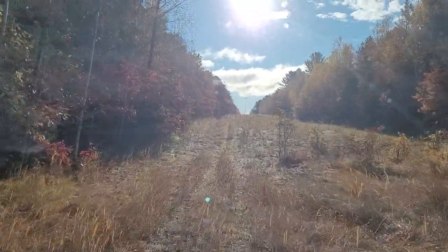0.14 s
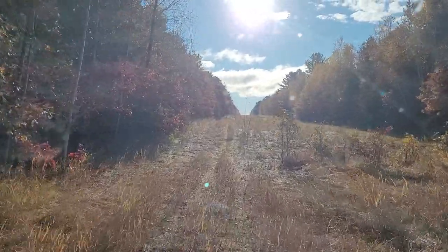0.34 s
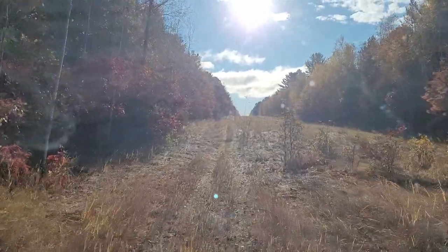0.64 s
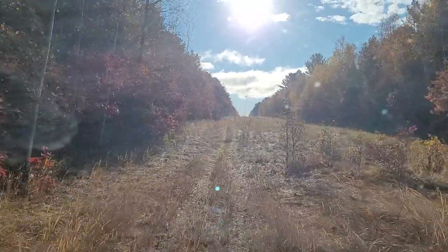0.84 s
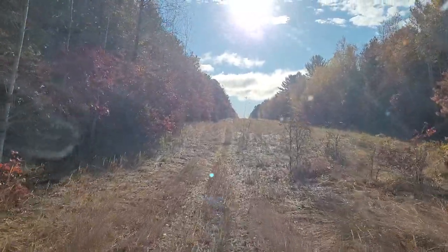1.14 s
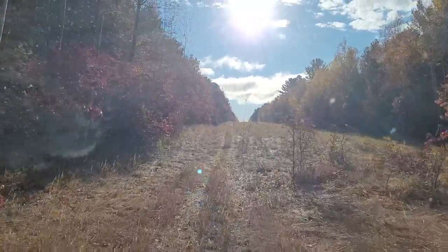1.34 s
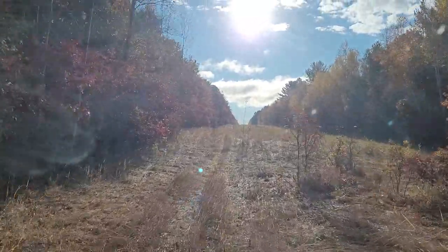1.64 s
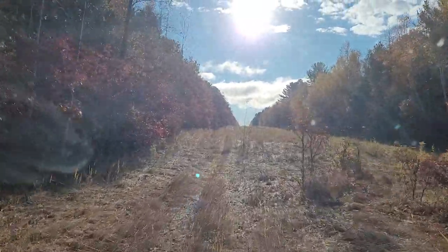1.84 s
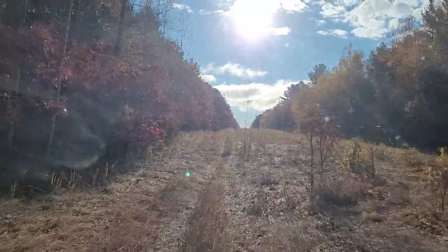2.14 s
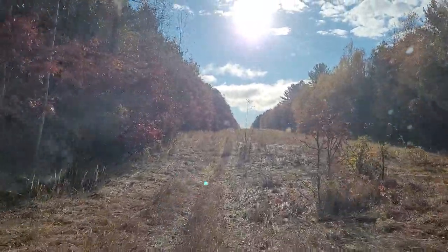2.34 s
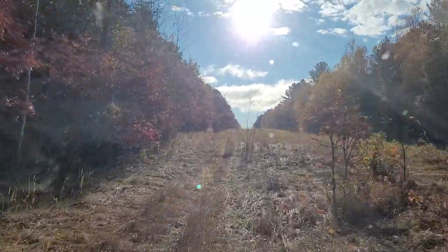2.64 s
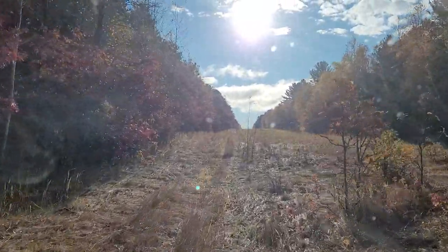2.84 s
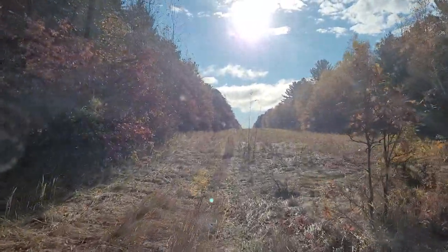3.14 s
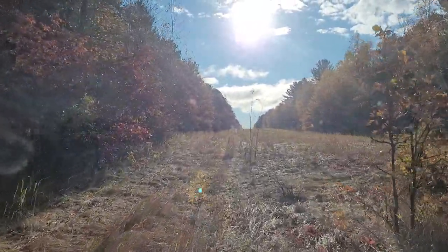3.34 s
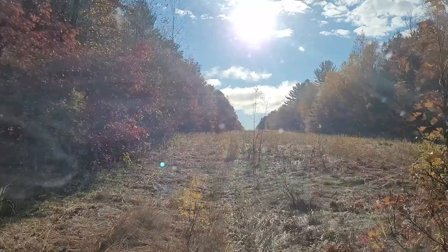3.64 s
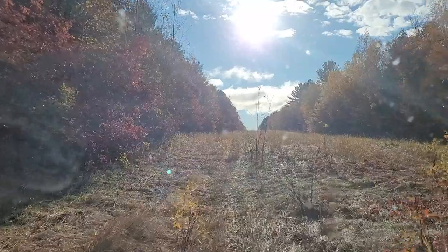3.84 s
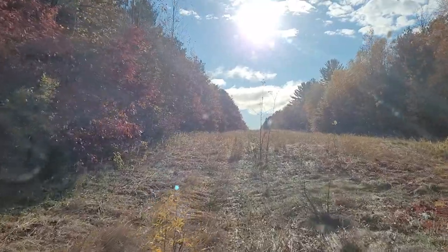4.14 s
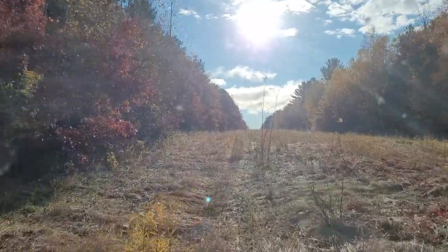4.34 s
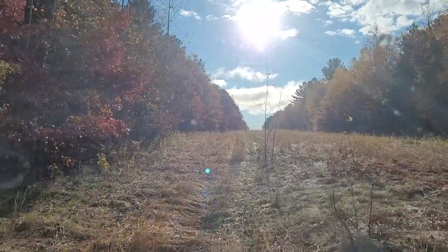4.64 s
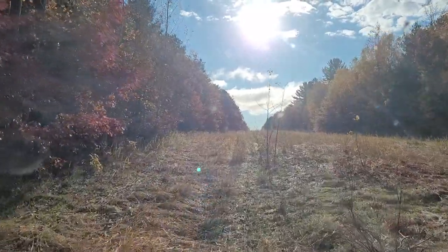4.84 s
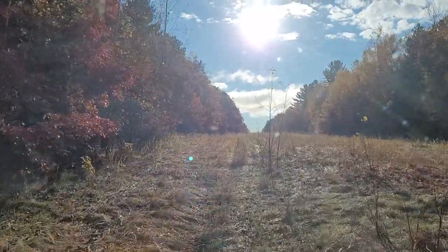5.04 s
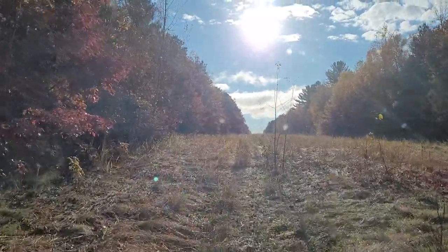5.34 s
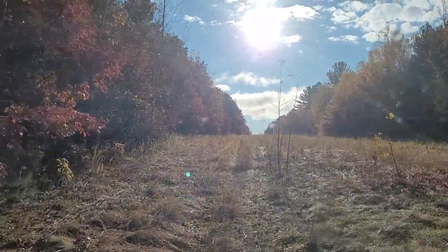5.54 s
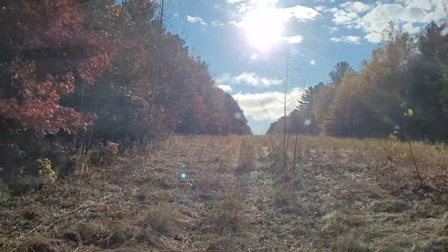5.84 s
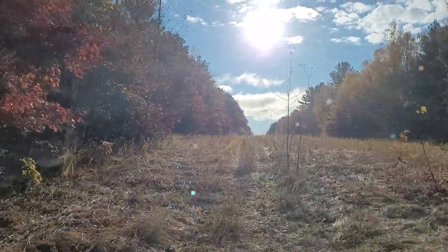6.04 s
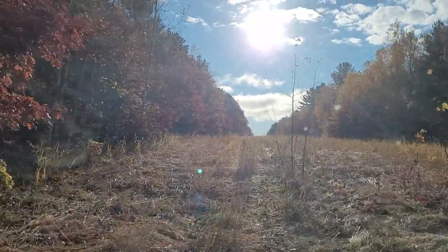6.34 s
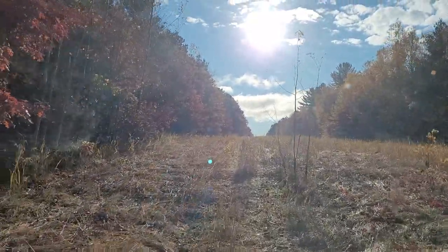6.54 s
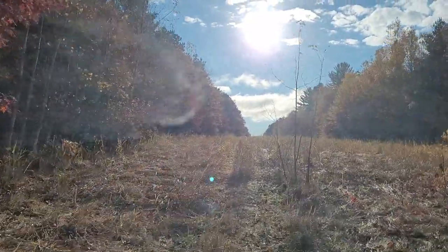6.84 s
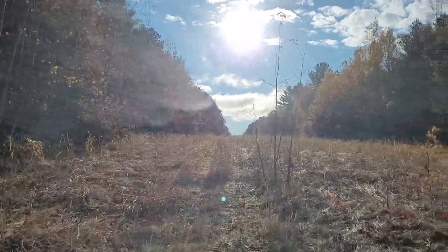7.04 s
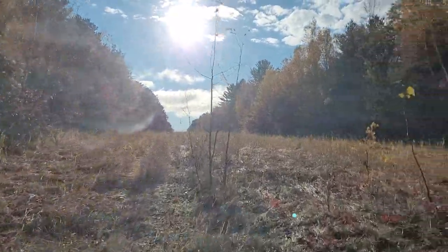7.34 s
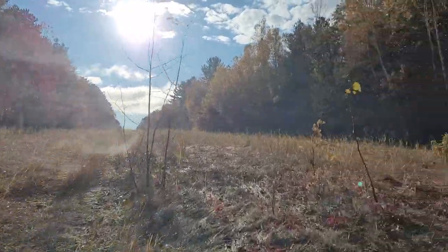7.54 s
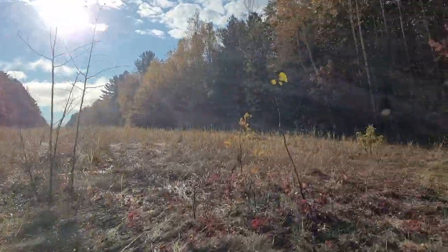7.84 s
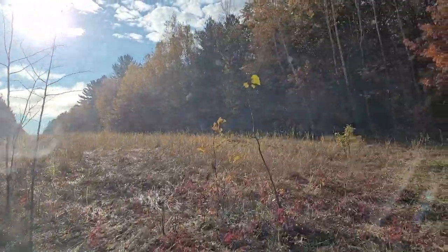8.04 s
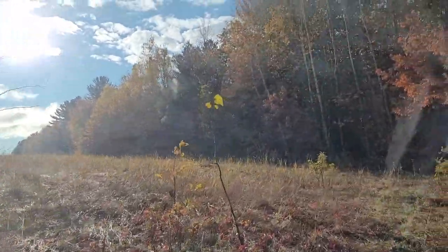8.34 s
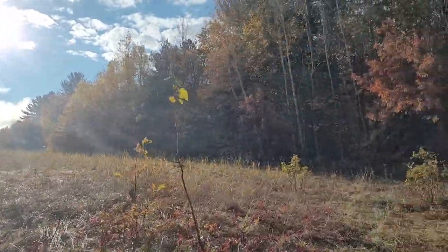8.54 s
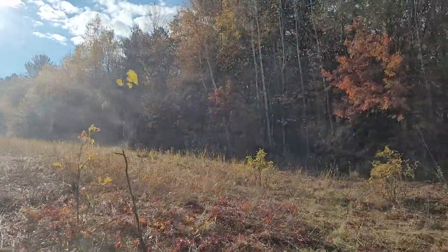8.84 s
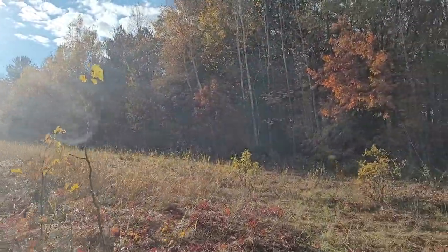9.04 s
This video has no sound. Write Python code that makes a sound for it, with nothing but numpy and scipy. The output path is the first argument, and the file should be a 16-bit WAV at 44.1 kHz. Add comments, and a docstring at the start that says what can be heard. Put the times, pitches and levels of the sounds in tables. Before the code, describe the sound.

A small off-road vehicle drives over grass with a low engine boom and rumbling tyres, slows, then pulls away as twigs snap.

```python
"""A low engine boom over rumbling tyres fills the cab of a side-by-side utility vehicle on a grass trail.
The four-stroke twin thumps on three low orders, drones in the body panels and growls in the air box.
Tyre lugs thud on the turf, the chassis shakes, and the drive train whirrs and whines.
The vehicle slows for a turn and pulls away; stalks brush its body, twigs snap, wheels drop into ruts."""
import sys
import numpy as np
from scipy import signal
from scipy.fft import rfft, irfft, next_fast_len
from scipy.io import wavfile
from scipy.ndimage import uniform_filter1d, map_coordinates

SR = 44100
rng = np.random.default_rng(int(sys.argv[2]) if len(sys.argv) > 2 else 0)


def int16_out(signal):
    """Quantize to a 16-bit WAV file."""
    q = np.round(np.clip(np.atleast_2d(signal).T, -1, 1) * 32767)
    wavfile.write(sys.argv[1], SR, q.astype(np.int16))


N = 405719
TIME = np.arange(N) / SR


# how the cab booms at each engine speed (cycle rate [Hz], order 2 [dB], order 3 [dB], order 4 [dB])
CAB_BOOM = [(24.16, -5, 0.5, -1.5), (26.2, 1, -6, 0.5), (26.6, 1, -9, 0), (28.9, -1.5, -11.5, 1.5),
            (29.4, -5.5, -14.5, 0), (30.2, -3, -10.5, -3.5), (31.8, -9, -12.5, -1.5)]
def exhaust(hz, angle, db, boom_hz=59.9, boom_width_hz=8, flutter_db=.5):
    """Three clean orders make one uneven thump a cycle; the lowest lags as it passes the cab's boom."""
    cab_hz, *booms_db = np.transpose(CAB_BOOM)
    gains = [undb(db + np.interp(hz, cab_hz, boom_db)) for boom_db in booms_db]
    lag = 1.2 + 1.4 * np.arctan((2 * hz - boom_hz) / (boom_width_hz / 2))
    second = gains[0] * np.cos(2 * angle - lag)
    third = gains[1] * np.cos(3 * angle)
    fourth = gains[2] * np.cos(4 * angle)
    return pan(np.sqrt(2) * (second - third + fourth) * undb(flutter_db * walk(24)), 1.23)


# pace of the lugs meeting the ground (time [s], rate [Hz])
LUG_RATE = [(0, 38.4), (3.0, 39), (4.3, 37.63), (5.0, 35.66), (6.3, 33.4), (7.3, 27), (9.2, 26.8)]
# weight of the tyre thud (time [s], level [dB])
LUG_LEVEL = [(0, -27), (.5, -15.5), (1.15, -21.5), (1.5, -23), (1.95, -19), (2.24, -25), (2.55, -17.5),
             (3.1, -23), (3.4, -15.5), (3.85, -28), (4.2, -20), (4.5, -26), (4.9, -19), (5.35, -28),
             (6.15, -26.5), (7.3, -44), (9.2, -41)]
def tyres(waver=.013):
    """Lugs thud on the turf, harder on firm stretches and fading as the vehicle slows."""
    (hz,), (db,) = curves(LUG_RATE), curves(LUG_LEVEL)
    phase = 2 * np.pi * np.cumsum(hz * (1 + waver * walk(8.2))) / SR
    return pan(np.sqrt(2) * np.sin(phase) * undb(db + .98 * walk(10)), 2.3)


# tone of the chassis rumble (frequency [Hz], relative level [dB])
CHASSIS_EQ = [(18, -29.5), (30, -9.5), (50, 1.5), (74, -1.5), (90, -12.5), (112, -6), (145, -13),
              (290, -15), (370, -23), (440, -23.5), (590, -32), (720, -27), (830, -35), (1200, -41)]
def chassis(angle, effort_db, wide_hz=480, speed_db_per_octave=3):
    """Frame and bodywork rumble, shaken once a cycle and louder with ground speed."""
    (lug_hz,) = curves(LUG_RATE)
    throb = 1 - .36 * np.cos(angle)
    shake = throb * undb(.5 * walk(9) + .044 * effort_db + speed_db_per_octave * np.log2(lug_hz))
    mid = colour(rng.standard_normal(N) * shake, CHASSIS_EQ)
    # the stereo image narrows toward the bass
    side_eq = [(f, db + 20 * np.log10(.84 / np.hypot(1, (wide_hz / f) ** .61))) for f, db in CHASSIS_EQ]
    side = colour(rng.standard_normal(N) * shake, side_eq)
    return pan(unit(np.array([mid + side, mid - side])), 3.3) * undb(-25)


# body panel resonances (centre [Hz], width [Hz], relative level [dB])
PANEL_MODES = [(131.6, 67, -34.5), (170.1, 13, -30), (201, 52, -40.5), (256, 18, -37), (281, 15, -38),
               (326, 56, -44), (418.3, 12, -46.5), (434.5, 44, -42), (459.5, 29, -40.5), (541, 88, -48)]
def panels(hz, angle, effort_db):
    """The body panels drone where engine orders meet their resonances."""
    drone = overtones(hz, angle, PANEL_MODES, rough=.15, flutter_hz=14, spread=.45)
    return pan(drone, 2.7) * undb(.5 * effort_db - 4.5)


# air box resonances (centre [Hz], width [Hz], relative level [dB])
INTAKE_MODES = [(656, 40, -12), (700, 50, -2.5), (722, 55, -2), (775, 30, -12), (855, 39, -11)]
def intake(hz, angle, db):
    """The air box growls on the engine orders, with a rush of air at each gulp."""
    gulps = rng.standard_normal((2, N)) * (1 - .5 * np.cos(angle - 2.2))
    air = unit(colour(gulps, [(560, -20), (650, -15.5), (700, 1), (780, -6), (900, -15)]))
    growl = overtones(hz, angle, INTAKE_MODES, rough=.45, flutter_hz=30, spread=.3)
    return (growl + air * undb(-15.5)) * undb(db)


# uneven firing favours some orders and starves others (order [x cycle rate], gain [dB])
FIRING_BALANCE = [(5, 2), (6, 1), (7, -5), (8, 4), (9, -1), (10, 1), (11, -4), (12, 4), (13, 2), (14, -4),
                  (15, 0), (16, 0), (17, -2), (18, -4), (19, 0), (22, -3), (24, 0), (25, 0), (26, -3),
                  (28, 1), (32, -4)]
def overtones(hz, angle, modes, rough, flutter_hz, spread):
    """Higher engine orders swell as they slide through resonances; no two firings shake them alike."""
    out = np.zeros((2, N))
    grid_hz = np.arange(1200.)
    power = sum(undb(2 * db) / (1 + ((grid_hz - f) / (width / 2)) ** 2) ** 2.06 for f, width, db in modes)
    first, last = round(modes[0][0] / hz.max()), round(modes[-1][0] / np.median(hz))
    for order in range(max(first, 5), last + 2):
        start_phase = rng.uniform(0, 2 * np.pi)
        gain = np.interp(order * hz, grid_hz, np.sqrt(2 * power)) * (1 + rough * walk(flutter_hz))
        gain *= undb(np.interp(order, *np.transpose(FIRING_BALANCE)))
        phase = order * angle + start_phase + rough * walk(flutter_hz)
        # shorter waves arrive further out of step left and right
        skew = (-1) ** order * spread * min(order / 16, 1)
        out += gain * np.cos([phase + skew, phase - skew])
    return out


# tone of the belt, gear and valve whirr (frequency [Hz], relative level [dB])
WHIRR_EQ = [(400, -1), (900, 1.1), (1350, -1.6), (1750, 0.65), (2100, -0.8), (2450, -3.5), (3000, -5.5),
            (4400, -12), (5600, -17), (7700, -21.5), (8500, -31), (10000, -28), (12200, -23),
            (15800, -24.5)]
def drive_train(angle, db, grain_db=.5):
    """Valves, gears and belt clatter in dense tiny knocks, partly locked to the crank."""
    locked = np.array([cycle_knocks(angle), cycle_knocks(angle)])
    knocks = rng.standard_normal((2, N)) + .95 * locked
    grains = knocks * undb(grain_db * walk(1200) + .55 * walk(10))
    left, right = colour(patchy(grains, depth_db=1.3), WHIRR_EQ)
    shaded_left = colour(left, [(20, -3.5), (2300, -4.5), (4200, .3), (8000, -1), (16000, -1.5)])
    return unit(np.array([shaded_left, right])) * undb(db)


def cycle_knocks(angle, count=1400):
    """A random run of tiny knocks that comes round again with every engine cycle."""
    place = angle / (2 * np.pi) * count % count
    return unit(map_coordinates(rng.standard_normal(count), [place], order=3, mode="grid-wrap"))


# cues for the load whines (order [x cycle rate], start [s], end [s], level [dB], roughness [0-1])
WHINE_CUES = [(56, 2.4, 3.3, -58, .15), (122, 0, 3.6, -68, .8), (15, .4, 3.65, -41.5, .2),
              (14, -.2, 3.65, -44, .25), (13, -.2, 3.65, -42.5, .2), (15, 3.6, 5.1, -46, .25),
              (20, 0, 3.6, -57, .4), (12, 4.9, 6.9, -47, .3), (38.4, 6.15, 6.85, -51, .65),
              (38.4, 6.8, 7.6, -56, .9), (38.4, 7.65, 8.2, -52, .9), (5, 6.8, 9.2, -35, .15),
              (8, 7.4, 8.4, -41.5, .3), (10, 8.15, 8.95, -38, .4), (25, 8.3, 9.4, -40, .4),
              (24, 4.4, 6.9, -49, .4), (16, 8.42, 8.97, -33, .1)]
def whines(angle):
    """Single orders sing for a while; the rough ones flutter in level and pitch from firing to firing."""
    out = np.zeros(N)
    for order, start, end, db, rough in WHINE_CUES:
        flutter = unit(1 + rough * walk(50))
        phase = order * angle + rough * walk(50)
        out += np.sqrt(2) * undb(db) * flutter * swell(start, end) * np.sin(phase)
    return out


# twig snaps, in relative band levels (time [s], low [dB], mid [dB], high [dB], decay [s])
TWIG_SNAPS = [(1.630, -65, -56, -48, .008), (3.713, -61, -52, -44, .008), (5.244, -52, -44.5, -33.5, .007),
              (5.250, -45, -36.5, -45, .009), (5.363, -59, -54, -55, .008), (6.081, -56, -45, -40.5, .009),
              (8.881, -36, -38, -54, .008), (8.921, -30, -58, -70, .014), (8.929, -32, -46, -66, .010)]
# stalk swishes, in the same bands (peak time [s], low [dB], mid [dB], high [dB], half length [s])
STALK_BRUSHES = [(1.4, -40.5, -51, -55, 0.014), (4.886, -53, -49, -57, 0.012),
                 (4.944, -39, -62, -72, 0.016), (6.627, -43, -61, -63, 0.011), (6.685, -48, -48, -53, 0.01),
                 (7.442, -46, -45, -53, 0.0079), (7.48, -41.5, -44, -49, 0.014),
                 (7.938, -69, -66, -60, .035), (8.15, -69, -53, -64, 0.25), (8.687, -66, -58, -45, 0.052),
                 (9.052, -38.5, -49, -49, 0.012), (9.091, -41, -56, -58, 0.011)]
# ring of the underbody when wood hits it (centre [Hz], width [Hz], lift [dB])
UNDERBODY_MODES = [(797, 40, 10), (1564, 55, 8), (2045, 50, 13), (2318, 60, 5), (3830, 140, 4),
                   (5180, 120, 4)]
def vegetation(grain_db=2.5):
    """Twigs crack and die away; stalks swell and fade in a fine crackle; both ring the underbody."""
    envelopes = np.zeros((3, N))
    for time, *db, decay in TWIG_SNAPS:
        envelopes += undb(db)[:, None] * hit(time, decay)
    for time, *db, half_length in STALK_BRUSHES:
        envelopes += undb(db)[:, None] * np.exp(-((TIME - time) / half_length) ** 2 / 2)
    low = [(800, -1.5), (1200, -5.5), (1600, -1.5), (2400, -1), (4000, -18)]
    mid = [(2800, 6), (4500, 5), (7800, -5), (9000, -18)]
    high = [(7500, -5.5), (9500, -5), (12000, 0), (13700, -2.5), (16000, 2)]
    contacts = rng.standard_normal((2, N)) * undb(grain_db * walk(350))
    crackle = resonate(contacts, UNDERBODY_MODES)
    bands = [envelope * unit(colour(crackle, eq)) for envelope, eq in zip(envelopes, (low, mid, high))]
    return pan(sum(bands), 2.8) * undb(1.5)


# wheels hitting ruts (time [s], level [dB], decay [s])
RUT_HITS = [(4.936, -29.5, 0.03), (7.45, -41, 0.11)]
def ruts():
    """A wheel drops into a rut and the bodywork knocks dully."""
    knock_eq = [(300, -10), (480, 13), (750, 3), (1150, 2), (1550, 1), (2000, -25)]
    knock = unit(colour(rng.standard_normal((2, N)), knock_eq))
    envelope = sum(undb(db) * hit(time, decay) for time, db, decay in RUT_HITS)
    return pan(knock, 3) * envelope


def stalk_squeak(peak_s=8.69, half_length_s=.038, hz=4750, fall_hz_per_s=9000, db=-45):
    """A stiff stalk drags along a panel with a rough squeak that sinks as it slides off."""
    age = TIME - peak_s
    centre_hz = hz - fall_hz_per_s * np.clip(age, -2 * half_length_s, 2 * half_length_s)
    return ring(centre_hz, width_hz=650) * undb(db) * np.exp(-(age / half_length_s) ** 2 / 2)


# chafe of the drive belt as the throttle closes (time [s], centre [Hz], level [dB])
BELT_CHAFE = [(5.9, 2160, -69), (6.6, 2116, -52), (6.92, 2014, -47.5), (7.1, 2020, -50), (7.25, 2104, -49),
              (7.35, 2020, -49), (7.62, 2060, -49), (7.95, 2000, -58)]
def belt():
    """The slack belt whines roughly while the vehicle coasts."""
    hz, db = curves(BELT_CHAFE)
    return pan(ring(hz, width_hz=150), 2.5) * undb(db)


# cues for the casing rings and a steady thin whine near 4.7 kHz (centre [Hz], width [Hz], start [s], end [s],
# relative level [dB])
CASING_CUES = [(1640, 80, 7.7, 9.2, -55), (1770, 40, 2.4, 3.2, -55), (2760, 120, 0, 3.6, -58),
               (2780, 30, 6.7, 7.3, -62), (3170, 90, 0, 5.2, -61), (3490, 70, 6.8, 8.5, -63),
               (3840, 50, 0, 2.4, -66), (4320, 150, 1.5, 3.6, -62), (4200, 200, 7.7, 8.15, -59),
               (4550, 50, 6.9, 7.7, -67), (4690, 35, 0, 4.2, -64), (5150, 80, 4.6, 7.7, -68),
               (7850, 200, 0, 3.6, -73)]
def casings():
    """Engine and gear casings sing faintly, each shaken for a while; a thin steady whine near 4.7 kHz runs
    through the first seconds."""
    out = np.zeros((2, N))
    for hz, width, start, end, db in CASING_CUES:
        out += ring(hz, width) * undb(db + 1.5 * walk(5)) * swell(start, end)
    return out * undb(1)


def undb(db):
    """Decibels to gain."""
    return 10 ** (np.asarray(db) / 20)


def unit(x):
    """Scale to an rms of 1."""
    return x / np.sqrt(np.mean(x ** 2))


def pan(x, right_db):
    """Lean a sound to the right."""
    return x * undb(np.array([[-right_db], [right_db]]) / 2)


def curves(table):
    """Automation lanes: each column after the time as one value per sample."""
    times, *columns = np.transpose(table)
    return [np.interp(TIME, times, column) for column in columns]


def walk(rate_hz):
    """Smooth random wandering with a spread near 1."""
    hold = max(int(SR / rate_hz), 2)
    steps = np.repeat(rng.standard_normal(N // hold + 1), hold)[:N]
    return 1.305 * uniform_filter1d(uniform_filter1d(steps, hold), hold)


def swell(start, end, fade_s=.2):
    """Fade in, hold and fade out between two times."""
    return np.clip(np.minimum(TIME - start, end - TIME) / fade_s, 0, 1)


def hit(start, decay_s):
    """An instant attack with an exponential tail."""
    return (TIME >= start) * np.exp(-np.abs(TIME - start) / decay_s)


def ring(hz, width_hz):
    """A randomly shaken resonance whose centre may move, unrelated left and right."""
    phase = 2 * np.pi * np.cumsum(hz * np.ones(N)) / SR
    return np.array([walk(2 * width_hz) * np.cos(phase) + walk(2 * width_hz) * np.sin(phase)
                     for _ in range(2)])


def colour(x, eq):
    """Equalise through (frequency [Hz], gain [dB]) points, rolling off beyond the ends."""
    hz, db = np.transpose(eq)
    size = next_fast_len(N)
    f = np.maximum(np.arange(size // 2 + 1) * SR / size, 1)
    rolloff = np.minimum(f / hz[0], 1) ** 2 * np.minimum(hz[-1] / f, 1) ** 2
    gain = rolloff * undb(np.interp(np.log(f), np.log(hz), db))
    return irfft(rfft(x, size) * gain, size)[..., :N]


def resonate(x, modes):
    """Lift a sound around each resonance."""
    size = next_fast_len(N)
    f = np.arange(size // 2 + 1) * SR / size
    lift_db = sum(db / (1 + ((f - hz) / (width / 2)) ** 2) for hz, width, db in modes)
    return irfft(rfft(x, size) * undb(lift_db), size)[..., :N]


def patchy(x, depth_db, width_hz=110, hold_s=.09):
    """Narrow bands of a sound swell and fade, each on its own."""
    f, t, spectra = signal.stft(x, SR, nperseg=1024)
    places = np.meshgrid(f / width_hz, t / hold_s, indexing="ij")
    swells = map_coordinates(rng.standard_normal((256, 128)), places, order=3, mode="grid-wrap")
    return signal.istft(spectra * undb(depth_db * swells), SR, nperseg=1024)[1][..., :N]


# revs: cruising, easing off, three dips in the turn (time [s], four-stroke cycle rate [Hz])
ENGINE_SPEED = [(0, 32.3), (.35, 31.81), (.95, 31.41), (1.25, 31.74), (1.5, 31.46), (2.95, 31.48),
                (3.55, 30.65), (3.9, 30.63), (4.65, 30.08), (5.15, 29.38), (6.15, 28.59), (6.35, 28.97),
                (6.75, 28.42), (7.1, 25.69), (7.4, 24.31), (7.8, 26.21), (8.15, 23.74), (8.45, 27.4),
                (8.75, 27.75), (8.95, 25.45), (9.2, 27.95)]
# throttle: nudged, closed for the turn, opened in bursts (time [s], relative level [dB])
THROTTLE = [(0, -10), (.35, -1), (1.9, -5.5), (3.4, -2.5), (3.65, -5.5), (4.55, -8.5), (4.85, -1.5),
            (5.7, -9.5), (6.1, -8), (6.7, -2.5), (6.92, -11), (7.3, -14.5), (7.7, -4.5), (7.95, -1),
            (8.1, -5), (8.35, 5), (8.76, 5), (8.97, 1), (9.2, 6)]
# how hard the engine drives the panels and, slightly, the chassis (time [s], relative drive [dB])
BODY_DRIVE = [(0, -42), (1.1, -42), (3.4, -38.5), (3.65, -40), (4.7, -36.5), (5.1, -49.5), (6.7, -45.5),
              (7.2, -45.5), (8.2, -43), (8.7, -39.5), (8.95, -41.5), (9.2, -31.5)]
def scene(cruise_hz=32.35):
    """One cycle angle keeps the engine orders in step; throttle and revs ride thump, growl and whirr."""
    (hz,), (throttle_db,), (drive_db,) = curves(ENGINE_SPEED), curves(THROTTLE), curves(BODY_DRIVE)
    rev_octaves = np.log2(hz / cruise_hz)
    thump_db = -17.5 + .21 * throttle_db + .25 * rev_octaves
    growl_db = -45.5 + .65 * throttle_db - 1.5 * rev_octaves
    whirr_db = -38 + .2 * throttle_db + 6 * rev_octaves
    effort_db = drive_db - np.mean(drive_db)
    angle = 2 * np.pi * np.cumsum(hz * (1 + .002 * walk(25))) / SR  # one turn per four-stroke cycle
    engine = panels(hz, angle, effort_db) + exhaust(hz, angle, thump_db) + intake(hz, angle, growl_db)
    transmission = drive_train(angle, whirr_db) + casings() + whines(angle) + belt()
    trail = chassis(angle, effort_db) + tyres() + ruts() + vegetation() + stalk_squeak()
    return engine + transmission + trail


def record(dry, top_hz=15800):
    """A steep low-pass trims the highest treble."""
    return signal.sosfilt(signal.ellip(10, .1, 80, top_hz, fs=SR, output="sos"), dry)


dry = scene()
out = record(dry)
int16_out(out)
```